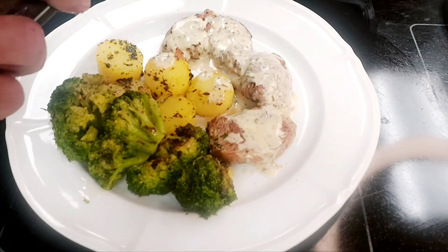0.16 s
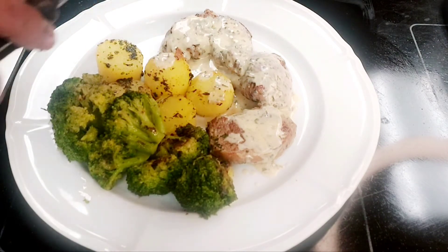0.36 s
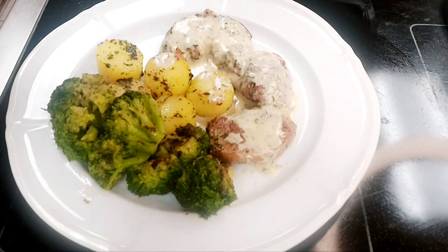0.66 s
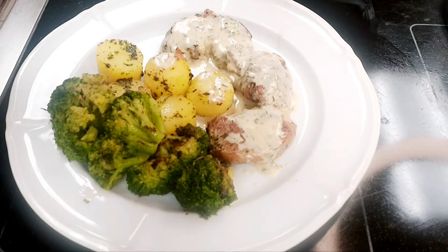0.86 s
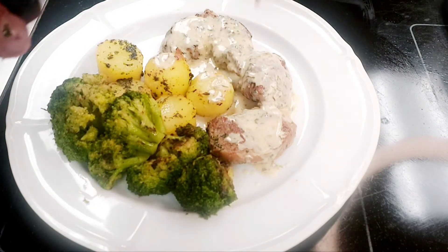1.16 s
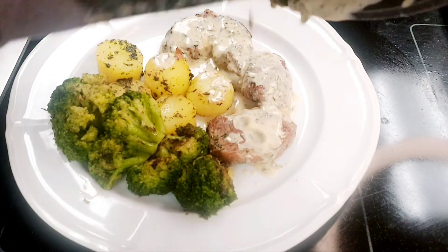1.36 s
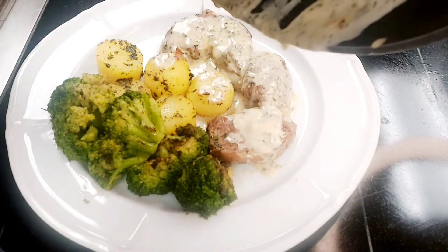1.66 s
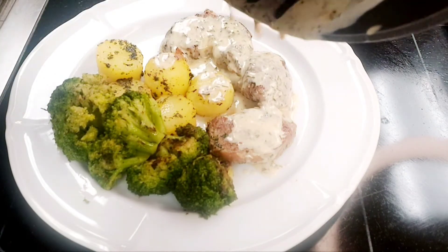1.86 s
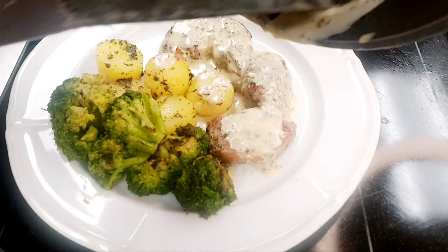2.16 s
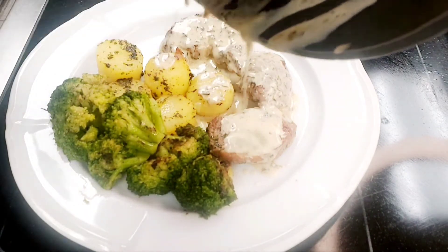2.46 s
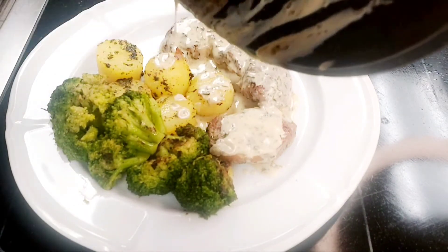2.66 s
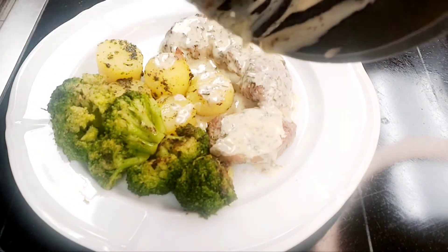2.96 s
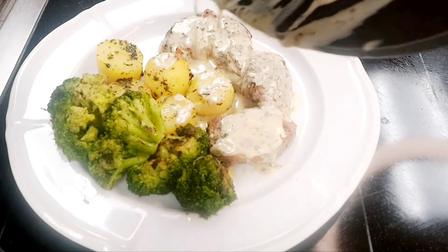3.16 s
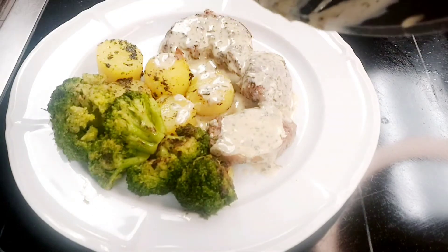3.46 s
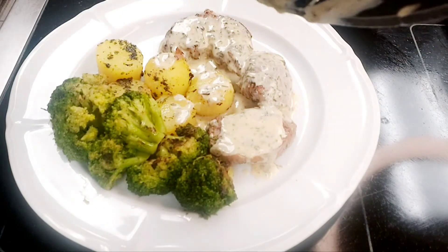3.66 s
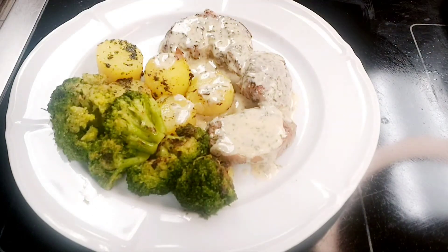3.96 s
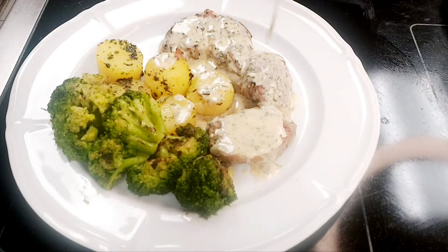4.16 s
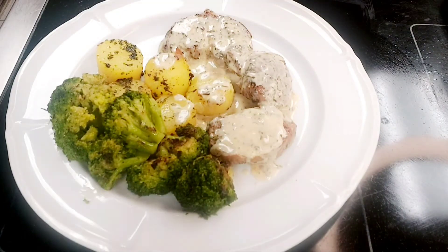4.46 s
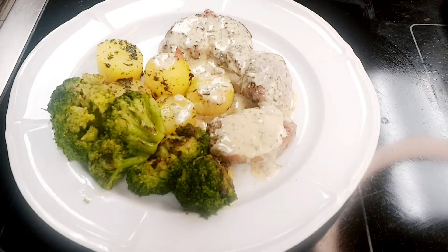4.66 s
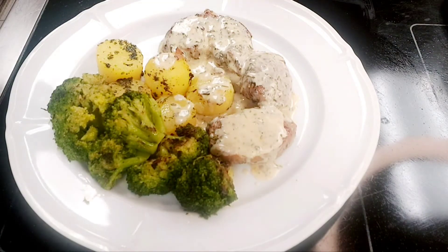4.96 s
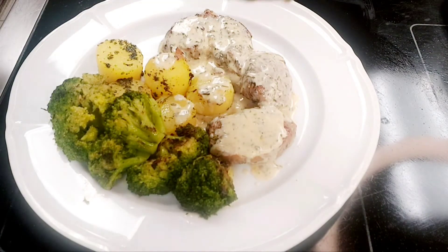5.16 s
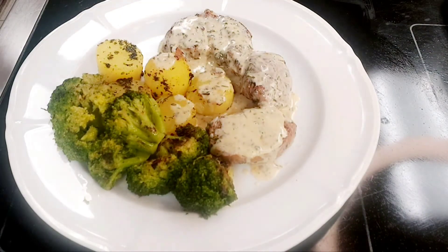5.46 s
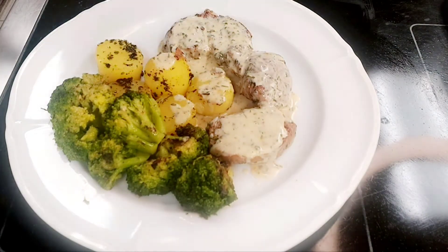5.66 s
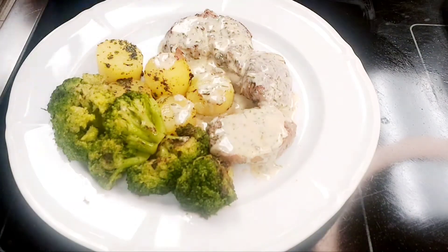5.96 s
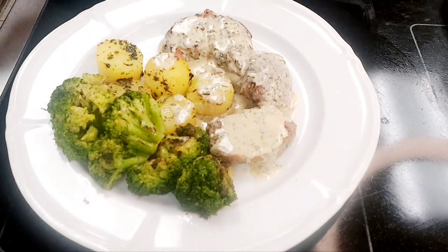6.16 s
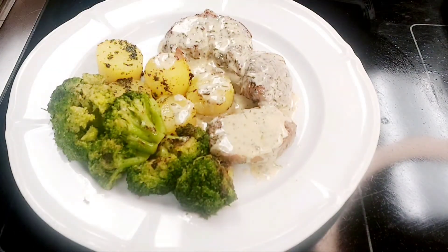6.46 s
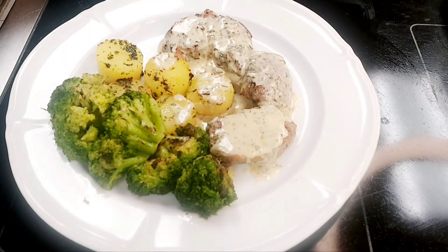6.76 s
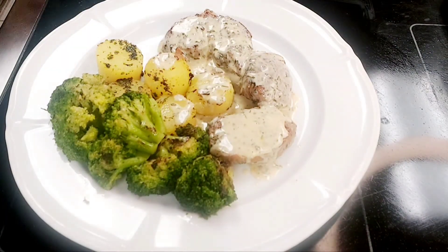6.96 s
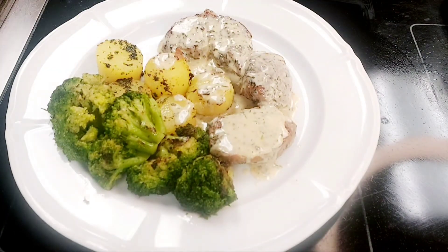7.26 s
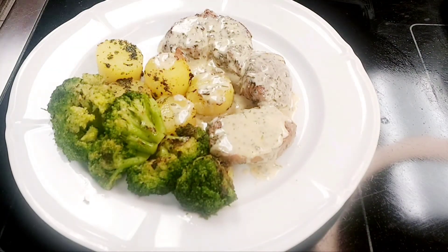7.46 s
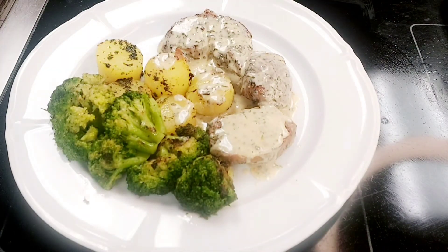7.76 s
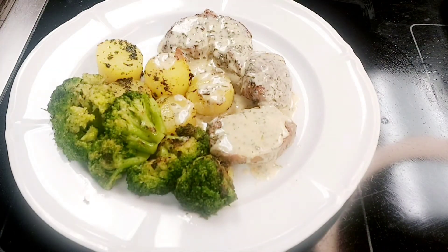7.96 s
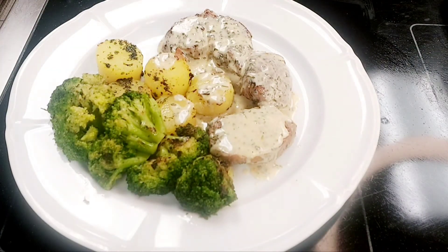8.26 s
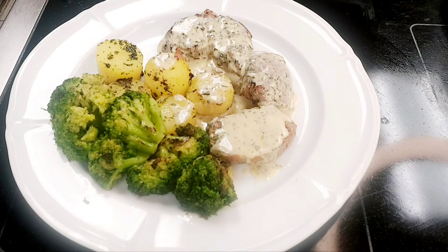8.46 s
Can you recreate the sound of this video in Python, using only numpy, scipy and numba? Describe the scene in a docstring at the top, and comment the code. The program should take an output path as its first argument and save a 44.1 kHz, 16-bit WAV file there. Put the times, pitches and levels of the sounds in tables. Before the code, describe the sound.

Spoon knocks and gritty scrapes on a metal pan, a heavy rattling set-down on glass, then quiet room tone with faint cloth rustle.

```python
"""Spoon and pan in a small kitchen

A metal spoon knocks and scrapes a frying pan; the pan is then set down on a glass hob, rocks and slides to rest.
Impulses and stick-slip clicks excite damped resonances of pan and glass, and the walls reverberate.
Shaped noise makes the room tone, a rustling sleeve and small ticks; wavering sines make a fridge hum and whine.
"""
import sys
import numpy as np
from scipy import signal
from scipy.fft import rfft, irfft, next_fast_len
from scipy.io import wavfile
from scipy.ndimage import uniform_filter1d
from numba import njit

SR = 44100
rng = np.random.default_rng(int(sys.argv[2]) if len(sys.argv) > 2 else 0)


def wav_out(sig):
    """Save sig, one row per channel (or a flat mono array), as 16-bit PCM at SR to the path in sys.argv[1]."""
    wavfile.write(sys.argv[1], SR, np.round(np.clip(np.atleast_2d(sig).T, -1, 1) * 32767).astype(np.int16))


N = 379701  # length in samples


def amp(db):
    """Decibel law: level to amplitude gain."""
    return 10 ** (np.asarray(db, float) / 20)


def unit(x):
    """Normalisation: scale to rms 1."""
    return x / np.sqrt(np.mean(x ** 2))


def read(table, hz):
    """Interpolation of an (f/Hz, value) table along a log-frequency axis."""
    f, v = np.transpose(table)
    return np.interp(np.log(hz + 1), np.log(f), v)


def shape(x, gain):
    """Linear filtering: multiply the spectrum by a gain that is a function of frequency."""
    n = next_fast_len(x.shape[-1])
    spectrum = rfft(x, n) * gain(np.fft.rfftfreq(n, 1 / SR))
    return irfft(spectrum, n)[..., :x.shape[-1]]


def bandpass(x, order, edges_hz):
    """Band limitation: Butterworth filter between two frequencies."""
    return signal.sosfilt(signal.butter(order, edges_hz, "band", fs=SR, output="sos"), x)


def walk(rate):
    """Slow random modulation: Gaussian levels, rate of them per second, joined by ramps."""
    k = int(SR / rate)
    return uniform_filter1d(np.repeat(rng.standard_normal(N // k + 1), k)[:N], k)


EDGE_DB, ROUNDNESS = -28, 2.4  # level one rise before and one fall after the peak; 1 pointed, 2 rounded


def swell(s, rise, fall, db):
    """Gesture envelope: the gain of one stroke leans in, peaks and lets go."""
    t = np.arange(N) / SR - s
    distance = np.clip(np.maximum(-t / rise, t / fall), 0, 4)
    return amp(db + EDGE_DB * distance ** ROUNDNESS)


def tail(bands, like_hz):
    """Diffuse decay: octave-wide noise bands, each dying at its own rate, alike at both ports in the bass."""
    t, out = np.arange(SR // 2) / SR, 0
    for hz, db, t60 in bands:
        like = np.exp(-hz / like_hz)
        one, other = rng.standard_normal((2, len(t)))
        pair = np.array([one, like * one + np.sqrt(1 - like ** 2) * other])
        band = shape(pair, lambda f: np.exp(-2 * np.log2((f + 1) / hz) ** 2))
        out = out + amp(db) * unit(band) * np.exp(-np.log(1000) * t / t60)
    return out


def convolve(x, response):
    """Superposition: each sample of the sound launches the two-channel response."""
    return signal.fftconvolve(np.atleast_2d(x), response, axes=1)[:, :N]


# spectrum of the room tone: f/Hz, relative level per Hz/dB
ROOM_SPECTRUM = [(25, -48), (45, -25.5), (70, -1.5), (147, 0), (211, -6.5), (300, -0.5), (472, -14),
                 (904, -21.5), (1600, -33.5), (2400, -37), (3100, -35.5), (7200, -47), (9500, -42),
                 (13900, -39)]
ROOM_DB = -52.5
# squared coherence of left and right room tone: f/Hz, coherence (0-1)
ROOM_COHERENCE = [(60, 1), (130, 0.91), (290, 0.9), (630, 0.9), (1380, 0.03), (3030, 0), (6640, 0.03),
                  (14500, 0)]


def room_tone():
    """Partly coherent noise field: bass alike at both ports, low and high bands fluctuating separately."""
    mid, side = rng.standard_normal((2, N))
    like = lambda f: np.clip(read(ROOM_COHERENCE, f), 0, 1) ** .5
    mid = shape(mid, lambda f: amp(read(ROOM_SPECTRUM, f)) * np.sqrt(1 + like(f)))
    side = shape(side, lambda f: amp(read(ROOM_SPECTRUM, f)) * np.sqrt(1 - like(f)))
    air = np.array([mid + side, mid - side]) / np.std(mid) * amp(ROOM_DB)
    low = shape(air, lambda f: 1 / (1 + (f / 600.0) ** 4))
    high = air - low
    return low * amp(2.0 * walk(6.8)) + high * amp(0.8 * walk(2.2))


def wavering_tone(hz, gain):
    """Modulated sine: level and phase wander; the phase differs more between ports at high pitch."""
    turns = rng.random((2, 1)) * min(hz / 5000., 1)
    phase = 2 * np.pi * (hz * np.arange(N) / SR + turns + 0.12 * walk(8))
    return np.sqrt(2) * gain * amp(3 * walk(25)) * np.sin(phase)


# lines of the fridge: f/Hz, nominal rms level/dB
FRIDGE_LINES = [(48.4, -65), (150.7, -64), (253, -67), (894, -84), (1071, -81), (1249, -82), (1976, -77),
                (2121, -90), (2993, -90)]


def fridge():
    """Line spectrum: a sum of sustained, wavering tones."""
    return sum(wavering_tone(hz, amp(db)) for hz, db in FRIDGE_LINES)


# faint passing tones: f/Hz, peak t/s, rise/s, fall/s, nominal rms level/dB
PASSING_TONES = [(1943, 5.2, 9, 2.5, -81), (1071, 4.45, .9, .8, -79), (1071, 5.45, .6, .7, -79),
                 (894, 5.5, .8, .6, -79), (1071, 7.7, .6, .5, -74)]


def passing_tones():
    """Amplitude modulation: faint wavering tones swell and fade."""
    return sum(wavering_tone(hz, swell(*stroke)) for hz, *stroke in PASSING_TONES)


# spectrum of the rustle: f/Hz, relative level per Hz/dB
CLOTH_SPECTRUM = [(590, -27.5), (1000, 3), (2040, 4.5), (2500, -1.5), (4360, 0), (12100, -10),
                  (15000, -4.5)]
# close rustles: peak t/s, rise/s, fall/s, level/dB
RUSTLES = [(7.731, 0.093, .3, -61.5), (8.1, 0.31, 0.51, -62), (8.58, 0.15, 0.13, -63.5)]
# faint narrow swishes further off: peak t/s, rise/s, fall/s, level/dB
SWISHES = [(4.26, .05, .1, -73.5), (4.63, .05, 0.12, -76.5), (5.13, 0.053, 0.26, -73.5),
           (5.71, 0.018, 0.26, -65.5), (6.98, .04, 0.1, -62.5)]
SWISH_HZ = (2600, 4700)


def sleeve():
    """Friction noise of cloth on cloth: a soft grainy hiss close by, thinner swishes further off."""
    grain = rng.standard_normal((2, N)) * amp(1.6 * walk(53))
    thin = bandpass(grain, 2, SWISH_HZ)
    soft = shape(grain, lambda f: amp(read(CLOTH_SPECTRUM, f)))
    rustle = unit(soft) * sum(swell(*row) for row in RUSTLES)
    swish = unit(thin) * sum(swell(*row) for row in SWISHES)
    return rustle + swish


# small ticks nearby: t/s, peak level/dB, centre f/Hz, decay to 1/e before filtering/ms
TICK_EVENTS = [(0.676, -60, 2500, 2.6), (0.705, -58.5, 3230, 2.5), (6.985, -53.5, 3580, 5.1),
               (7.817, -46.5, 5950, 0.8), (8.248, -49, 1216, 3.8), (8.289, -44, 1204, 1.9),
               (8.541, -56, 1110, 6.8), (8.547, -29.5, 890, 4.2), (8.546, -65, 5600, 1)]


def ticks():
    """Transient noise: short decaying bursts round a broad centre frequency."""
    out, t = np.zeros((2, N + SR // 10)), np.arange(SR // 10) / SR
    for s, db, hz, ms in TICK_EVENTS:
        burst = rng.standard_normal((2, len(t))) * np.exp(-1000 * t / ms)
        burst = bandpass(burst, 1, (.7 * hz, 1.4 * hz))
        i = int(s * SR)
        out[:, i:i + len(t)] += amp(db) * burst / np.abs(burst).max()
    return out[:, :N]


# reverberation of the room: f/Hz, level/dB, t60/s
WALLS = [(131, -39.5, 0.15), (242, -38.5, 0.33), (660, -60.5, 0.7), (830, -48.5, 0.37), (1980, -51, 0.42),
         (4200, -50.5, 0.45), (8100, -51, 0.35), (14300, -32.5, 0.28)]


def reverberation(near):
    """Reverberation: near sounds return from the walls after 5 ms as a diffuse decay."""
    response = np.pad(tail(WALLS, 1300.0), ((0, 0), (SR // 200, 0)))
    return convolve(near.mean(axis=0), response)


# sensitivity of the two ports to near sounds: f/Hz, left minus right level/dB
PORT_BALANCE = [(60, -12.5), (110, -2), (200, 0), (370, 0.5), (690, 3.5), (1270, 2), (2330, 3), (4290, 6),
                (6500, -0.5), (8200, -18.5), (10500, -13.5), (14500, -3.5)]


def at_ports(x):
    """Interaural-style level difference: each port takes half of the imbalance."""
    return shape(x, lambda f: amp(np.array([[.5], [-.5]]) * read(PORT_BALANCE, f)))


RANGE_HZ = (550, 820, 1250, 1880, 2500, 4700)  # edges between deep, boom, bell, ring, clang, clink and hiss
RANGE_FLOOR_HZ = np.append(0, RANGE_HZ)[:, None]


def voiced(forces):
    """Band splitting: each force is kept to its own frequency range."""
    bands = [(pair, "band") for pair in zip(RANGE_HZ, RANGE_HZ[1:])]
    ranges = [(RANGE_HZ[0], "low"), *bands, (RANGE_HZ[-1], "high")]
    filters = [signal.butter(3, hz, kind, fs=SR, output="sos") for hz, kind in ranges]
    return np.array([signal.sosfilt(sos, x) for sos, x in zip(filters, forces)])


CHATTER_S, CHATTER_DB = 0.0033, -4  # metal skips on metal just after a blow: decay to 1/e, level
BLOW_HISS_DB = -2  # a blow's hiss against its clink


def blows(table):
    """Impulsive excitation: a sharp push in each range, then a brief chatter in the upper ranges."""
    t = np.arange(SR // 20) / SR
    forces = np.zeros((len(RANGE_HZ) + 1, N + len(t)))
    size = (len(table), len(t))
    skips = rng.standard_normal(size) * (rng.random(size) < 1500 / SR)  # about 1500 skips a second
    light = RANGE_FLOOR_HZ > 1500  # the light skips stir only the upper ranges
    for (s, db, deep, boom, bell, clang, clink), skip in zip(table, skips):
        push = amp(CHATTER_DB) * skip * np.exp(-t / CHATTER_S) * light + (t == 0)
        levels = np.c_[[deep, boom, bell, 0, clang, clink, clink + BLOW_HISS_DB]]
        i = int(max(s, 0) * SR)
        forces[:, i:i + len(t)] += amp(db + levels) * push
    return voiced(forces[:, :N])


def rubbing(strokes):
    """Stick-slip friction: dense uneven clicks follow the pressure, each range also wandering alone."""
    slips = rng.random(N) < 2500 / SR  # about 2500 slips a second
    clicks = slips * rng.standard_normal(N) * amp(2 * rng.exponential(size=N))
    alone = [3 * walk(30) for _ in range(len(RANGE_HZ) + 1)]
    clicks = unit(clicks) * amp(1.5 * walk(60) + 2 * walk(250) + alone)
    pressure = 0
    for s, rise, fall, db, deep, boom, bell, clang, clink, hiss in strokes:
        levels = np.c_[[deep, boom, bell, 0, clang, clink, hiss]]
        pressure = pressure + swell(s, rise, fall, db) * amp(levels)
    return voiced(clicks * pressure)


@njit
def mode(force, pole, keep):
    """Damped resonator: one complex pole; keep under 1 damps it further, sample by sample."""
    z, out = 0j, np.empty(len(force), np.complex128)
    for i in range(len(force)):
        z = z * pole * keep[i] + force[i]
        out[i] = z
    return out


PORT_LAG_S = 0.00017  # low modes reach the right port later, by at most a quarter cycle


def ring(modes, forces, stifle_per_s, apart_hz=1100.0):
    """Modal superposition: each mode is fed unsteadily by its range; high ones drift in phase between ports."""
    out, keep = np.zeros((2, N)), np.exp(-stifle_per_s / SR)
    for hz, db, t60 in modes:
        pole = np.exp(2j * np.pi * hz / SR - np.log(1000) / (t60 * SR))
        feed = forces[np.searchsorted(RANGE_HZ, hz)] * amp(db + 1.8 * walk(14))
        z = mode(feed + 1e-18, pole, keep)
        delay = min(2 * np.pi * hz * PORT_LAG_S, np.pi / 2)
        lag = delay + min(hz / apart_hz, 1) ** 2 * .9 * walk(5)
        out += [z.imag, (z * np.exp(-1j * lag)).imag]
    return out


# pan on hob: t/s, level/dB, then relative level/dB of deep, boom, bell, clang, clink
SET_DOWN_BLOWS = [(6.1978, -10.5, 9.5, 10, 1.5, -1, -1), (6.2274, -17.5, -4.5, -5, -11, -18.5, -7),
                  (6.2731, -12.5, -1, 7.5, -6, -14.5, -8), (6.3044, -17.5, -15.5, -1.5, -5, -10, -10.5),
                  (6.4955, -14.5, -9.5, -13, 12.5, 5, 1.5), (6.5056, -6.5, 1.5, 3, -10, -5.5, -17),
                  (6.7196, -19, 5, 7, 5.5, -3.5, -26)]


def set_down():
    """Impact forces between pan and glass."""
    return amp(-14.5) * blows(SET_DOWN_BLOWS)


# base on glass: peak t/s, rise/s, fall/s, level/dB, then level/dB of deep, boom, bell, clang, clink, hiss
SLIDE_STROKES = [(6.23, 0.044, 0.13, -26.5, 1, 6, 14.5, 13, 4.5, 0.5),
                 (6.4, 0.19, 0.26, -32.5, -5.5, 0, -2.5, -3.5, 1, -7),
                 (6.55, 0.063, 0.16, -29, -4.5, -15.5, 3.5, 3.5, -4.5, -15),
                 (6.76, 0.16, 0.2, -45, -24, 2, 3.5, 3, -7.5, -18)]


def base_slide():
    """Friction forces of the pan base sliding on the glass."""
    return amp(-36.5) * rubbing(SLIDE_STROKES)


# clear modes of the glass: f/Hz, level/dB, t60/s
HOB_MODES = [(146, -4, .1), (215, -12, .06), (320, -3, .06), (372, 0, .08), (533, -8, .12), (735, 1, .09),
             (815, -6, .07), (940, -6, .06), (1060, -8, .06), (1170, -6, .08), (1290, -6, .07),
             (1465, 4, .07), (4270, -12, .06)]
# its overtones too crowded to tell apart: f/Hz, level/dB, t60/s
HOB_OVERTONES = [(162, -18, 0.099), (290, -24.5, 0.21), (540, -5, 0.12), (960, -2, 0.13), (1600, -1, 0.13),
                 (3980, 7, .12), (8260, -29.5, 0.12), (13000, -29, 0.099)]
# first contact of each blow on the glass: f/Hz, level/dB, t60/s
CONTACT_CRACK = [(1510, 8.5, 0.0091), (3500, 14, .008), (8000, -1.5, 0.005), (13100, -6.5, 0.047)]


def glass_hob(thump, slide):
    """Plate vibration: clear modes, a crowd of overtones, and a crack at each blow."""
    clear = amp(-5.5) * ring(HOB_MODES, thump + slide, np.zeros(N))
    crowd = convolve((thump + amp(-0.5) * slide).sum(axis=0), tail(HOB_OVERTONES, 1186.0))
    crack = convolve(thump.sum(axis=0), tail(CONTACT_CRACK, 1500.))
    return clear + crowd + crack


# spoon on pan: t/s, level/dB, then relative level/dB of deep, boom, bell, clang, clink
SPOON_BLOWS = [(0.001, -31.5, 2, 1.5, 4, -8, -7.5), (0.7915, -22.5, 5, 8, 7, -24, -23),
               (1.125, -25.5, -23.5, -13, 0, -5, -3), (1.2865, -35, 0, 2, -9, -3.5, -3),
               (1.8035, -24.5, -4, 2, 0.5, -5.5, -4.5), (2.0203, -22, 4, 1, 3, -5, -2),
               (2.2764, -40, -15, -13.5, 4, -15.5, -6), (2.698, -40.5, -5.5, -10.5, 8.5, -7, 9.5),
               (2.7294, -35.5, 10, 13.5, -8, -23, -9.5), (3.2306, -28.5, -2, 9.5, 3, -6.5, -5),
               (3.24, -28.5, -1.5, -4.5, 6, -0.5, -5.5), (3.2944, -36, -18, -15, 6, -9.5, -8),
               (3.8606, -30, 4, 2, 6, -2.5, 3.5), (3.872, -28, -8, -11, -14.5, 2, -1.5),
               (3.8864, -31, 4.5, -1.5, -27, -8.5, -16)]


def spoon_knocks():
    """Impact forces of the spoon, coloured by the place of contact."""
    return amp(1.0) * blows(SPOON_BLOWS)


# spoon edge on pan: peak t/s, rise/s, fall/s, level/dB, then level/dB of deep, boom, bell, clang, clink, hiss
SPOON_STROKES = [(.09, 0.2, 0.061, -44, 6.5, -15, 7, 5, -4.5, -7),
                 (.29, 0.11, 0.15, -41.5, -17, 0, -0.5, -1, -3, -5),
                 (.39, 0.037, 0.042, -46, -7, 6, 3.5, -7.5, 1, -2),
                 (.86, 0.082, 0.053, -52, 0.5, -2, -6.5, 10, -5, -7),
                 (.985, 0.083, 0.14, -36, 3, 9, 7, -1, -2.5, -9.5),
                 (1.095, 0.1, 0.12, -27, 0, -2, -7.5, 5.5, 5, -12),
                 (1.3, 0.18, 0.21, -36, 5, 7, 5.5, 1.5, 0.5, -0.5),
                 (2.15, 0.055, 0.14, -33.5, 0, 1.5, -1.5, 3, -2.5, -2),
                 (2.3, 0.085, 0.12, -38, -4.5, 0, 1, -0.5, -3, -3),
                 (2.714, 0.032, 0.033, -46, 22.5, 11, 16.5, 13.5, 6.5, 8),
                 (2.83, 0.09, 0.094, -30, -2.5, -3.5, 1.5, 2, 0, -1),
                 (3.321, 0.089, 0.073, -27.5, -13, 0.5, 6.5, -1.5, 0.5, -3.5),
                 (3.385, 0.045, 0.02, -40, -12.5, -9, -18, -2.5, -17.5, -22.5)]


def spoon_scrapes():
    """Friction forces of the dragged spoon edge."""
    return amp(-28.5) * rubbing(SPOON_STROKES)


GRIP_PER_S, GRIP_DB = 42, -42  # extra decay rate under the spoon; pressure level at which half of it acts
FLAT_S, FLAT_PER_S = 6.49, 48  # time when the base lies flat on the glass; extra decay rate from then on


def pan_damping():
    """Contact damping: the pressing spoon, and later the glass, add to the pan's decay rate."""
    pressure = sum(swell(*row[:4]) for row in SPOON_STROKES)
    grip = GRIP_PER_S * pressure / (pressure + amp(GRIP_DB))
    return grip + FLAT_PER_S * (np.arange(N) / SR > FLAT_S)


# f/Hz and level/dB and t60/s of the dry rasp at the spoon's edge
RASP = [(6000, -31.0, 0.012), (8960, -22.5, 0.0044), (13060, -6.0, 0.009)]


def edge_rasp(rub):
    """Direct radiation: the finest grit is heard straight from the spoon's edge."""
    return convolve(rub.sum(axis=0), tail(RASP, 3000.))


# broad notes gliding as the spoon edge travels up the wall: start t/s, end t/s, from f/Hz, to f/Hz, level/dB
GLIDES = [(2.76, 2.86, 520, 1200, -4.5), (1.03, 1.13, 2400, 3700, -12), (2.2, 2.36, 2200, 1900, -10),
          (1.4, 1.41, 4600, 5400, -12.5), (3.28, 3.38, 3600, 3700, -10.5)]
GLIDE_WIDTH = .08  # bandwidth as a share of the starting pitch


def gliding_notes(force):
    """Moving resonance: friction is shifted down, low-passed and shifted back along a gliding pitch."""
    out = np.zeros(N)
    for start, end, from_hz, to_hz, db in GLIDES:
        span = slice(int(start * SR), int(end * SR))
        way = np.linspace(0, 1, span.stop - span.start)
        turn = np.exp(2j * np.pi * np.cumsum(from_hz * (to_hz / from_hz) ** way) / SR)
        pole = np.exp(-np.pi * GLIDE_WIDTH * from_hz / SR)
        note = (turn * signal.lfilter([1], [1, -pole], force[span] / turn)).imag
        out[span] += amp(db) * np.sin(np.pi * way) ** .5 * note
    return out


# clear modes of the pan: f/Hz, level/dB, t60 without contact damping/s
PAN_MODES = [(533, -5, .55), (572, -7, .04), (632, -14, .12), (770, -12, .14), (976, -9, .13),
             (1004, -14, .27), (1170, -21, .16), (1535, -1, .33), (1552, -12, .1), (1742, -19, .15),
             (1876, -19, .12), (2040, -13, .16), (2300, -8, .28), (2357, -17, .15), (2435, -14, .1),
             (2878, -11, .24), (3190, -9, .24), (3270, -18, .2), (3735, -10, .13), (3870, -20, .1),
             (4200, -11, .14), (4480, -14, .14), (4950, -5, .22), (5050, -13, .22), (5200, -16, .15),
             (5335, -18, .2), (5680, -18, .15), (5900, -17, .1), (6400, -18, .1), (7600, -26, .07),
             (8400, -28, .07), (10500, -33, .07)]
# its overtones too crowded to tell apart: f/Hz, level/dB, t60/s
PAN_OVERTONES = [(249, -59.5, 0.027), (506.78, -44.5, 0.027), (993, -14.5, 0.04), (1770, -10, 0.14),
                 (4100, -3, 0.14), (8920, -18.5, 0.013), (12880, -31.5, 0.0732)]
# how far rubbing stirs the crowded overtones: t/s, level/dB
GRITTINESS = [(.4, -3), (.95, -7), (1.18, -9), (1.32, -1), (2.2, -3), (2.75, 1), (2.9, 3), (3.35, 0)]
ROCKING_DB, FLAT_DB = 2, -1.5  # coupling from the hob while the pan rocks on its rim, and once it lies flat


def frying_pan(knock, rub, thump, slide):
    """Shell vibration: spoon and hob drive the clear modes, the spoon also a crowd of overtones."""
    t = np.arange(N) / SR
    # touching the glass stifles the lowest modes: the hob drives only the upper ranges
    resting = (RANGE_FLOOR_HZ > 1000) * amp(np.where(t < FLAT_S, ROCKING_DB, FLAT_DB))
    force = knock + rub + resting * (thump + amp(-2.0) * slide)
    clear = ring(PAN_MODES, force, pan_damping())
    gritty = amp(np.interp(t, *np.transpose(GRITTINESS))) * rub
    return clear + convolve((knock + gritty).sum(axis=0), tail(PAN_OVERTONES, 530.0))


def cookware():
    """Coupled vibration: spoon and hob shake the pan, and the pan thumps the glass."""
    knock, rub = spoon_knocks(), spoon_scrapes()
    thump, slide = set_down(), base_slide()
    pan = frying_pan(knock, rub, thump, slide)
    spoon = edge_rasp(rub) + gliding_notes(rub.sum(axis=0))
    return pan + spoon + glass_hob(thump, slide)


def scene():
    """Sound field: background, plus near sounds direct and reverberated, unequal at the two ports."""
    background = (room_tone() + fridge() + passing_tones()) * amp([[.9], [-.9]])  # a little louder at left
    # small objects radiate no deep bass
    no_bass = signal.butter(4, 115, "high", fs=SR, output="sos")
    near = signal.sosfilt(no_bass, cookware() + ticks())
    return at_ports(near + reverberation(near)) + sleeve() + background


@njit
def follow(x, attack, release):
    """Envelope detection: a level follower, quicker up than down."""
    y, e = np.empty(len(x)), 0.
    for i in range(len(x)):
        e += (x[i] - e) * (attack if x[i] > e else release)
        y[i] = e
    return y


def record(dry):
    """Dynamic compression: gain falls as the followed level rises; a steep low-pass cuts the top."""
    attack_s, release_s, top_hz = 0.15, 1.2, 14900
    loud = follow(np.abs(dry).max(axis=0), 1 / (attack_s * SR), 1 / (release_s * SR))
    eased = dry / (1 + loud / amp(-1))
    return signal.sosfilt(signal.ellip(10, .2, 70, top_hz, fs=SR, output="sos"), eased)


dry = scene()
out = record(dry)
wav_out(out)
```